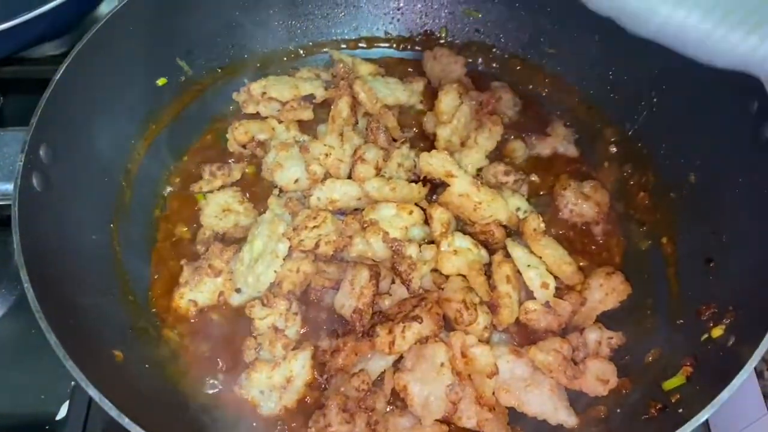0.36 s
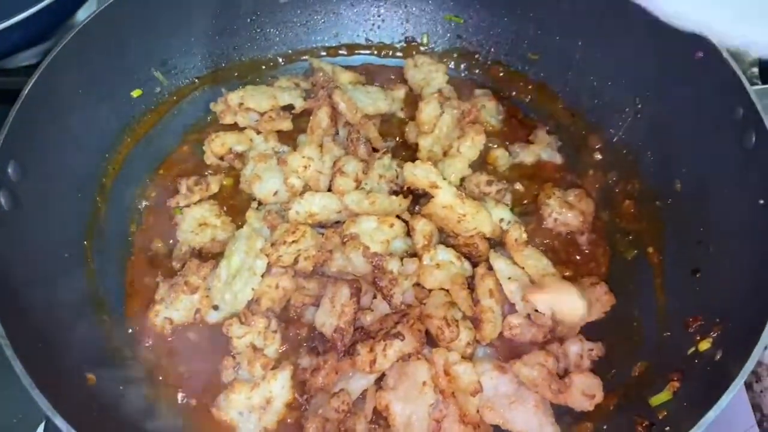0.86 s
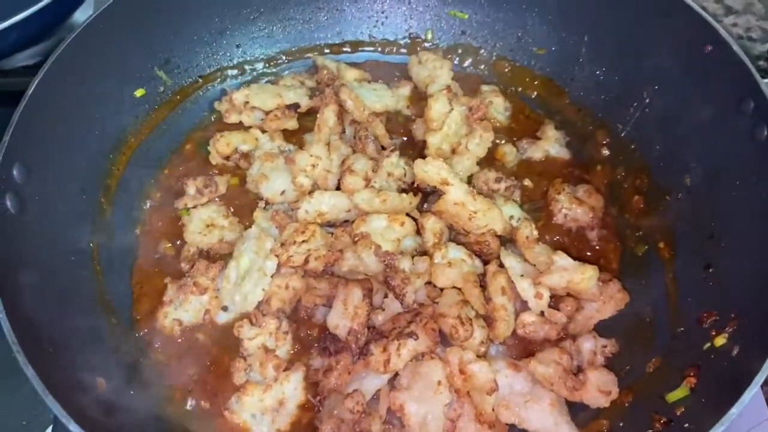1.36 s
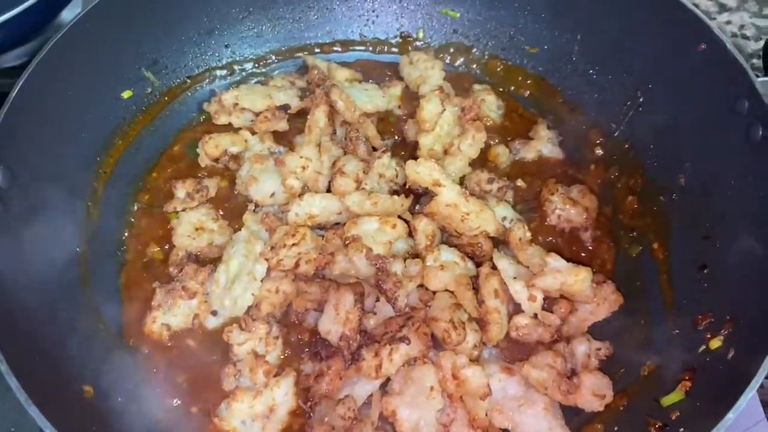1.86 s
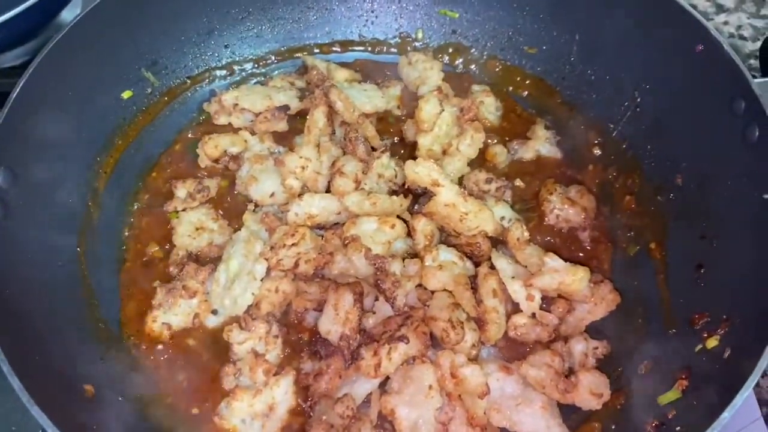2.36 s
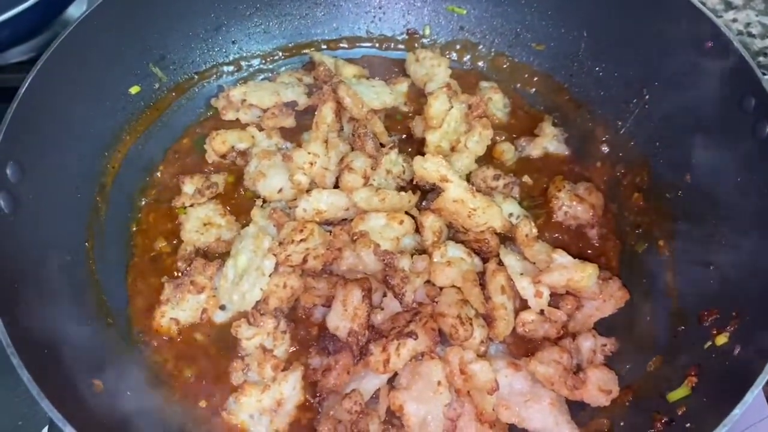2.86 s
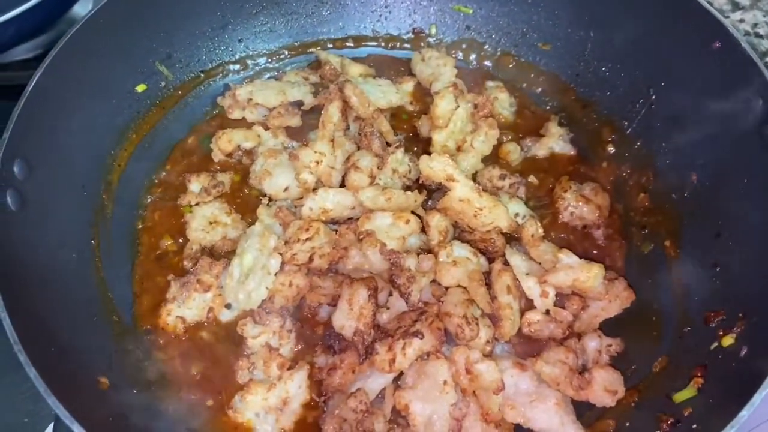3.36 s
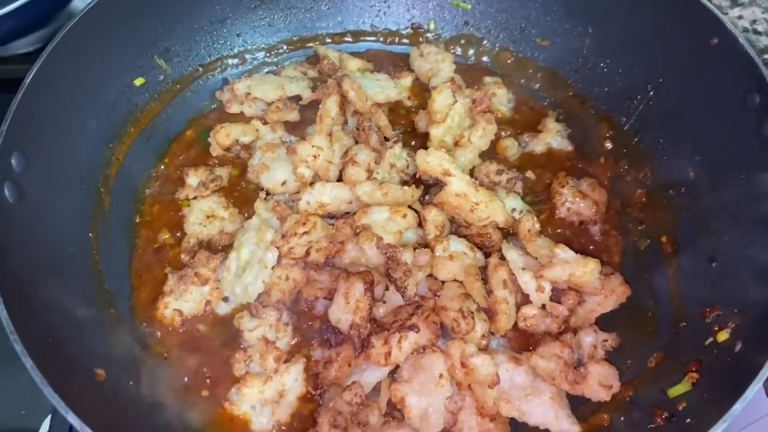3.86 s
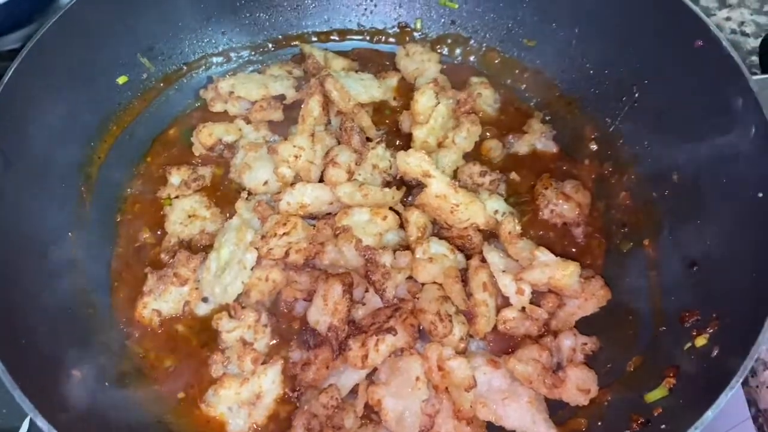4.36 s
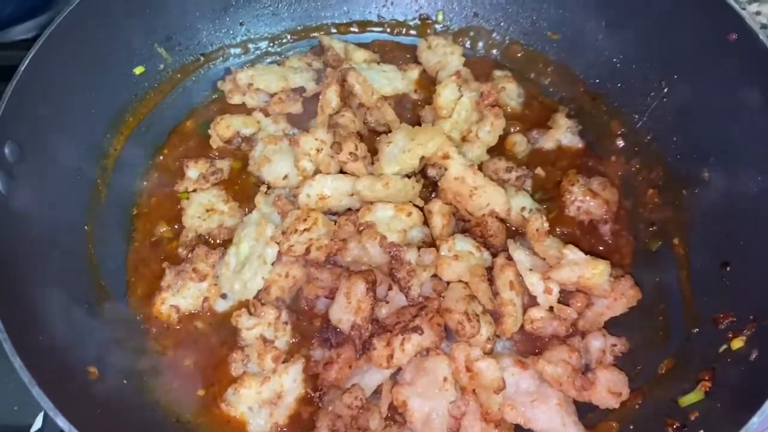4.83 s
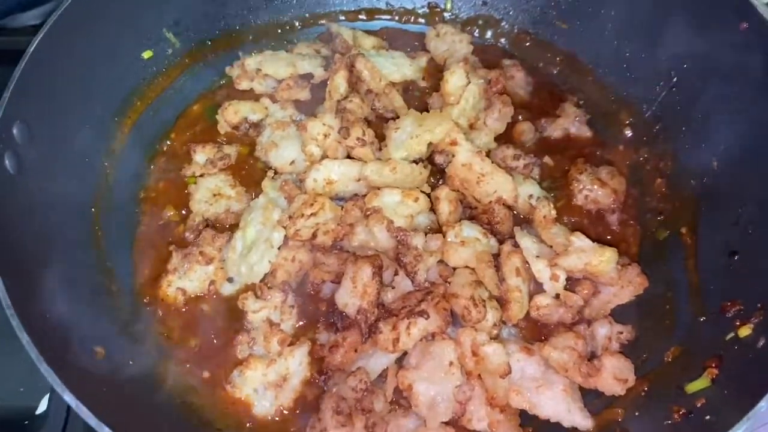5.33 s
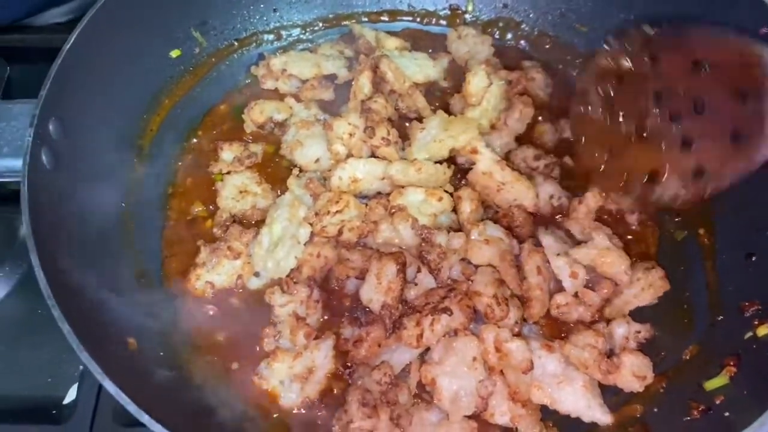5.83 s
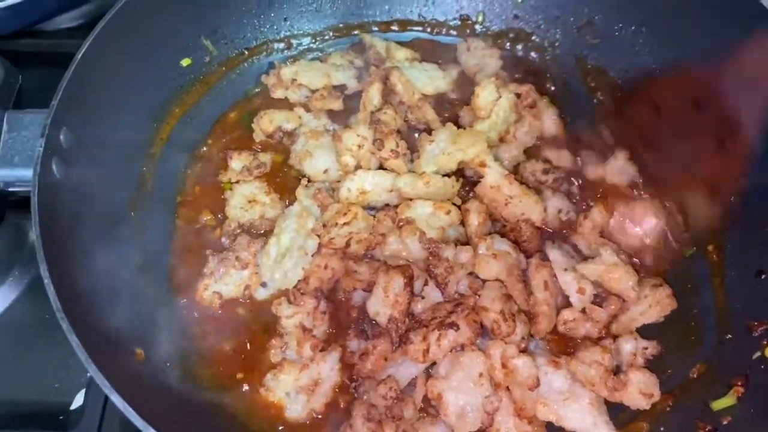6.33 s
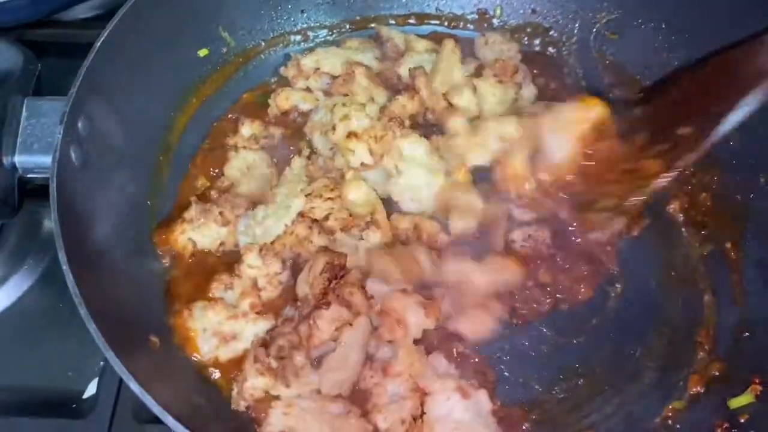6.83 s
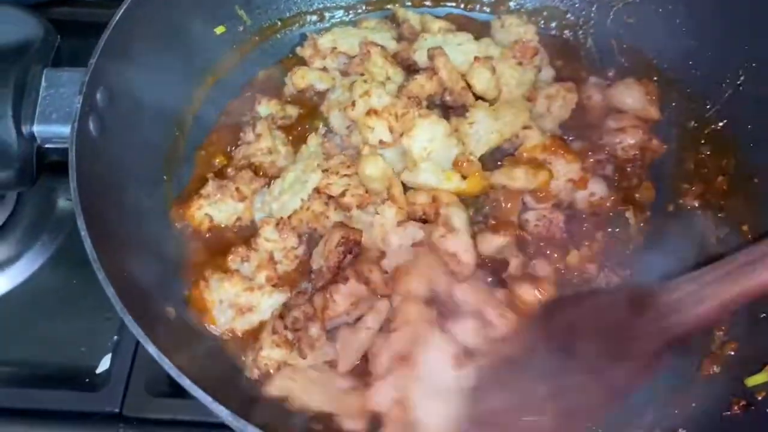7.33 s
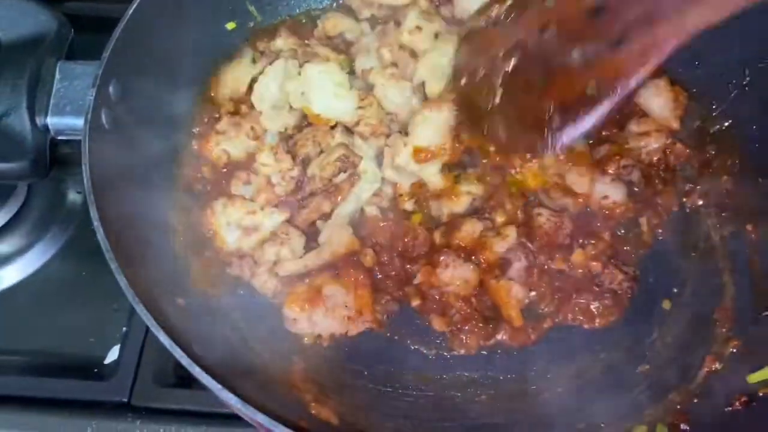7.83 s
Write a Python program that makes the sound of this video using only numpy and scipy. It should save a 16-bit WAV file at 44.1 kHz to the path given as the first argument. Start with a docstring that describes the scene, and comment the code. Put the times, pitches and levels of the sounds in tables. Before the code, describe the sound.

A steady low burner and fan drone lies beneath quiet, fine-grained simmering and crackle, slightly stronger after 3 seconds. In the first 0.6 seconds a thin, faint mid-pitched tone comes and goes. A dull low knock with a small bright splat lands at 0.7. At 2.1 a dish is set down with a sharp ceramic clack; tiny taps and a spoon clink follow at 2.3-2.7. At 2.8 a plate hits hard, by far the loudest blow, clipping harshly with a short ring. Firm double knocks and a clink come at 3.3-3.45, with duller raps around 3.8. Faint taps occur near 4.5-4.75, then mostly simmer until 5.66. From 6.2 a wooden spatula makes grainy, hollow scrapes, at 6.2, 6.55, 7.1 and 7.55-7.8, with wetter hiss and light pan knocks, ending on a soft low thump at 7.9. The close, small hard room adds short tails.

```python
"""Under it all a kitchen drones (shaped noise) and sauce simmers in a wok (hiss and crackle).
First a thin tone comes and goes; then come knocks with a low body (dying tones) and bright noise puffs.
Beside the stove a hand sets down a dish, then a plate with the loudest blow, at which the sound clips.
A metal spoon clinks along the way, and more knocks follow. Last, a wooden spatula scrapes through the food
(rough grains in the pan's resonances). A small hard room answers the blows with a dying noise tail."""
import sys
import numpy as np
from scipy import signal
from scipy.fft import rfft, irfft, next_fast_len
from scipy.io import wavfile
from scipy.ndimage import uniform_filter1d, map_coordinates

SR = 44100
rng = np.random.default_rng(int(sys.argv[2]) if len(sys.argv) > 2 else 0)


def invert_db(level):
    """Linear amplitude ratio for a level in decibels (20 dB per decade), elementwise."""
    return 10 ** (np.asarray(level, dtype=float) / 20)


def pcm_store(signal):
    """Save signal as 16-bit PCM."""
    levels = np.round(np.clip(np.atleast_2d(signal), -1, 1) * 32767)
    wavfile.write(sys.argv[1], SR, levels.astype(np.int16).T)


N = 350595  # length of the scene in samples

# Tone colour of burner and fan: (frequency [Hz], relative level per Hz [dB])
DRONE_COLOUR = [(15, -20), (25, -0.5), (45, -5.5), (65, -3.5), (110, -1.5), (165, -12.5), (190, -6.5),
                (265, -12.5), (360, -5), (430, -10), (545, -7), (800, -8.5), (1250, -11.5), (1600, -12),
                (1900, -16.5), (2600, -20.5), (4000, -82)]
# Air resonances around the stove: (frequency [Hz], width [Hz], gain [dB])
AIR_SPACES = [(120, 26, 3), (208, 9, 8.5), (535, 33, 7.5), (1000, 43, 6.5)]
# Tone colour of the bubbling sauce: (frequency [Hz], relative level [dB])
SIZZLE_COLOUR = [(1500, -11), (1900, -9), (2300, -12.5), (2700, 0.5), (3400, 2.5), (4500, -2), (5400, 2),
                 (6900, 0.5), (8500, -1), (10500, -1.5), (13100, 1.5), (15100, -0.5), (16000, -2.5)]
# How hard the pan simmers: (time [s], simmer gain [dB])
SIMMER_GAIN = [(0, 0.5), (2, 0.5), (3.1, 2), (4.6, 2), (6.1, 1.5), (6.9, 2), (7.5, 2.5), (7.95, 0.5)]
# A thin tone that comes and goes: (start [s], length before the fade [s], rms level [dB])
WHINE_TIMES = [(0.038, .1, -59), (0.156, .04, -57), (0.328, .09, -51.5), (.49, .09, -60)]
# How fast the room's answer dies: (frequency [Hz], time to fall 60 dB [s])
ROOM_DECAY = [(200, 0.22), (1000, 0.3), (4000, 0.24), (12000, 0.11)]
# Low body of the blows, and a few thumps alone:
# (time [s], rough peak level [dB], frequency [Hz], time to fall 60 dB [s])
LOW_BODIES = [(0.706, -29.5, 216, 0.28), (.708, -34, 357, 0.28), (2.101, -38.5, 128, 0.38),
              (2.797, -30, 65, 0.2), (2.794, -30.5, 130, 0.14), (2.796, -26.5, 334, 0.11),
              (3.339, -32, 126, 0.2), (3.338, -22.5, 350, 0.081), (3.416, -28.5, 358, 0.13),
              (3.765, -41, 69, 0.34), (3.855, -33, 299, 0.068), (4.048, -36, 255, 0.16),
              (4.239, -36.5, 392, 0.14), (4.25, -35, 743, 0.076), (4.287, -36, 400, 0.066),
              (4.545, -34.5, 727, .1), (4.752, -38, 346, .13), (6.124, -28.5, 212.4, 0.31),
              (7.891, -30.5, 263.4, 0.14), (7.913, -33.5, 296, 0.11)]
# Short puffs of bright noise, splats of sauce, some of them during the spatula strokes: # (time [s], noise
# level before filtering [dB], centre [Hz], time to fall 60 dB [s])
BRIGHT_PUFFS = [(.700, -27.5, 6350, .1), (0.708, -30, 5540, 0.16), (4.510, -33.5, 8600, 0.078),
                (6.272, -33.5, 11000, .05), (7.13, -40, 5600, 0.22), (7.285, -43, 9000, .12),
                (7.582, -39, 10000, .058)]
# Resonances of the pan under the blade: (frequency [Hz], width [Hz], relative level [dB])
PAN_MODES = [(232, 57, -2), (368, 46, 2), (538, 48, 3), (740, 33, 4), (1005, 155, -4), (1430, 160, -5),
             (1560, 390, -9)]
# Spatula strokes: (start [s], length before the fade [s], scrape level [dB],
# highest pitch aimed at by the hollow between blade and pan [Hz], hollow level over the scrape [dB])
SPATULA_STROKES = [(6.191, .33, -45, 1560, -7), (6.552, .25, -51.5, 1156, -12), (7.097, 0.21, -48, 1432, 0),
                   (7.543, 0.088, -48, 1120, -4), (7.685, 0.065, -48.5, 1200, -7)]
# What the worktop rings with: (frequency [Hz], relative level [dB], time to fall 60 dB at damping 1 [s])
WORKTOP_MODES = [(299, 1.5, 0.064), (383.6, -2, 0.24), (468, -15.5, 0.19), (549, -1.5, 0.13),
                 (663, -7, 0.11), (756, 0.5, 0.072), (812, 1.5, 0.052), (907.6, 2, 0.069),
                 (1000, -1.5, 0.15), (1130, 4.5, 0.052), (1250, -1.5, 0.14), (1402, -4, 0.17),
                 (1540, -1, 0.058), (1939, -3.5, 0.11), (2260, -4, 0.032), (2490, -8.5, 0.21),
                 (3140, 3, 0.037)]
# Knocks on the worktop and pan: (time [s], rough peak level [dB], centre [Hz], damping factor,
# crack noise level before filtering [dB])
KNOCK_BLOWS = [(.700, -28.5, 500, 2.2, -48), (.709, -25.5, 550, 1.3, -43), (2.1026, -15.5, 1320, 0.8, -12),
               (2.289, -36.5, 1200, 0.8, -40), (2.307, -37.5, 1000, 1.3, -38),
               (2.576, -37, 1100, 0.72, -39), (2.690, -26.5, 1000, 0.57, -21.5),
               (2.7944, 3, 1050, 2.7, -12), (3.337, -12.5, 1280, 1.7, -24), (3.374, -19, 750, 1.4, -42),
               (3.4153, -16.5, 1280, 1.1, -22.5), (3.430, -11.5, 1250, 2.5, -23.5),
               (3.763, -17, 860, 1.5, -27.5), (3.797, -23.5, 805, 1, -36), (3.829, -24, 800, 0.91, -35),
               (3.855, -31, 500, 1.9, -44), (4.510, -38, 990, 1.2, -33), (4.545, -38, 700, 0.66, -38.5),
               (4.585, -36, 750, 1.2, -42), (4.634, -43, 1500, 0.98, -48), (4.748, -39, 450, 1.5, -48),
               (5.662, -33, 644, 0.81, -42), (6.119, -35, 496, 1.3, -44), (6.203, -38, 450, 1.2, -36),
               (6.865, -33.5, 1050, 0.82, -36), (7.027, -33.5, 770, 1.3, -49),
               (7.092, -36.5, 600, 2.3, -38), (7.291, -25, 1130, 1.5, -41), (7.363, -33, 1000, 2.2, -44),
               (7.574, -36, 520, 1.07, -51)]
# What the spoon, dish and plate ring with: (frequency [Hz], relative level [dB], time to fall 60 dB [s])
SPOON_MODES = [(6433, -8, .11), (7876, -6, .13), (9878, -3, .1), (10060, -6, .12), (12060, 0, .1),
               (13820, 0, .07), (14310, -3, .09), (14700, -3, .09), (15500, -8, .07)]
DISH_MODES = [(1491, -15, .4), (1852, -10, .18), (2202, -9, .24), (2439, -13, .2), (2568, -17, .22),
              (3122, -17, .2), (3591, -13, .2), (3941, -9, .2), (4210, -10, .19), (4500, -15, .15),
              (4786, -11, .17), (4974, -8, .085), (5518, -18, .17), (5790, 0, .055), (6718, -17, .18),
              (6858, -7, .11), (7994, -17, .18), (9238, -15, .12), (10600, -24, .1)]
PLATE_MODES = [(1685, -26, .18), (1857, -28, .2), (1958, -16, .14), (2089, -6, .13), (2110, -13, .2),
               (2164, -22, .45), (2190, -20, .3), (2227, -8, .24), (2280, -13, .2), (3628, 0, .07),
               (3700, -25, .25), (3850, -16, .14), (4290, -22, .17), (5190, -34, .17), (5537, -15, .21),
               (6425, -24, .24), (6837, -42, .25), (7843, -33, .26), (8247, -42, .2)]
# When each of them is struck: (time [s], rough peak level [dB])
SPOON_TIMES = [(2.6903, -33), (2.794, -19.5), (3.3368, -26), (3.3987, -27.5), (3.8921, -40), (4.5096, -41)]
DISH_TIMES = [(2.102, -15)]
PLATE_TIMES = [(2.7945, 1.5)]


def unit(x):
    """Scales a sound to rms 1."""
    return x / np.sqrt(np.mean(x ** 2) + 1e-20)


def along(points, hz):
    """Reads a table of (frequency, value) on a log frequency axis."""
    f, v = np.transpose(points)
    return np.interp(np.log(hz + 1), np.log(f + 1), v)


def wobble(rate):
    """A smooth random curve with rate random points a second."""
    knots = rng.standard_normal(int(N * rate / SR) + 4)
    return map_coordinates(knots, [np.arange(N) * rate / SR])


def filtered(x, response):
    """Shapes x by a complex response, given as a function of frequency."""
    m = next_fast_len(len(x) + 8192)
    spectrum = rfft(x, m) * response(np.fft.rfftfreq(m, 1 / SR))
    return irfft(spectrum, m)[:len(x)]


def peak(f, hz, width_hz):
    """A resonance of height 1 that answers only after it is driven."""
    return 1j * f * width_hz / (hz * hz - f * f + 1j * f * width_hz + 1e-9)


def patchy(depth_db):
    """Noise with patches of random gain in time and pitch."""
    z = signal.stft(rng.standard_normal(N), nperseg=512)[2]
    field = uniform_filter1d(rng.standard_normal(z.shape), size=6, axis=0)
    field = uniform_filter1d(field, size=10, axis=1)
    noise = signal.istft(z * invert_db(depth_db * unit(field)), nperseg=512)[1]
    return unit(noise[:N])


def grains(per_s, spread_db):
    """Clicks at random moments, a few much larger than the rest."""
    happens = rng.random(N) < per_s / SR
    size_db = spread_db * rng.exponential(size=N)
    return unit(happens * rng.standard_normal(N) * invert_db(size_db))


def add(track, s, sound):
    """Adds a sound into the track from time s."""
    part = track[round(s * SR):][:len(sound)]
    part += sound[:len(part)]


def envelope(start, length, attack, release):
    """Rises over the attack, holds until start + length, then fades over the release."""
    t = np.arange(N) / SR - start
    return np.clip(np.minimum(t / attack, 1 + (length - t) / release), 0, 1)


def burst(db, hz, t60):
    """A dying puff of noise around one pitch."""
    t = np.arange(SR // 4) / SR
    noise = rng.standard_normal(len(t)) * invert_db(db - 60 * t / max(t60, .005))
    return filtered(noise, lambda f: peak(f, hz, 1.0 * hz) ** 2)


def ringing(modes, attack, rough, gain_db=0, damping=1):
    """Dying tones; near reflections make each flutter in size and phase. The sum peaks near 1."""
    hz, db, t60 = np.transpose(modes)[:, :, None]
    t = np.arange(SR // 2) / SR
    knots = rng.standard_normal((2, len(modes), 80))
    flutter = [np.array([np.interp(t * 150, np.arange(80), k) for k in part]) for part in knots]
    depth = rough * np.minimum(t / 0.0057, 1)  # the flutter sets in over 5.7 ms
    size = (1 + depth * (flutter[0] + 1j * flutter[1])) / np.sqrt(1 + depth ** 2)
    phase = 2 * np.pi * (hz * t + rng.random(hz.shape))
    decay = invert_db(db + gain_db - 60 * damping * t / t60)
    ring = np.sum(decay * np.imag(size * np.exp(1j * phase)), axis=0)
    ring = ring * (1 - np.exp(-t / attack))
    first_rms = np.sqrt(np.mean(ring[:SR // 100] ** 2))  # over the first 10 ms
    return ring / (3 * first_rms)


def simmer():
    """How hard the pan simmers, in dB, for every sample."""
    s, db = np.transpose(SIMMER_GAIN)
    return np.interp(np.arange(N) / SR, s, db)


def drone():
    """Burner and fan noise, coloured by the air spaces around the stove."""
    BASE_DB, GROWTH = -50, 1  # level before simmer gain; dB per dB of simmer

    def colour(f):
        air_db = sum(db * abs(peak(f, hz, w)) ** 2 for hz, w, db in AIR_SPACES)
        return invert_db(along(DRONE_COLOUR, f) + air_db)

    level_db = BASE_DB + GROWTH * simmer() + 0.84 * wobble(5.2)
    return invert_db(level_db) * unit(filtered(patchy(depth_db=0.74), colour))


def sizzle():
    """Tiny bubbles burst in the sauce: a hiss with dense crackle; the finest fizz grows fastest."""
    HISS_DB, FIZZ_DB = -55.5, -54  # levels before simmer gain
    FIZZ_GROWTH = 1.35  # dB per dB of simmer
    simmer_db = simmer()
    bursts = patchy(depth_db=1.1) + .42 * grains(per_s=1200, spread_db=1.6)
    whole = filtered(bursts, lambda f: invert_db(along(SIZZLE_COLOUR, f)))
    fizz = filtered(whole, lambda f: np.clip((f - 7000) / 1500, 0, 1))
    hiss = whole - fizz
    mix = invert_db(HISS_DB + simmer_db) * unit(hiss)
    mix = mix + invert_db(FIZZ_DB + FIZZ_GROWTH * simmer_db) * unit(fizz)
    return invert_db(1.07 * wobble(7.9) + 0.48 * wobble(30)) * mix


def whine():
    """One slightly unsteady tone that fades in and out."""
    ATTACK_S, RELEASE_S = 0.017, .03
    size = sum(invert_db(db) * envelope(s, length, ATTACK_S, RELEASE_S) for s, length, db in WHINE_TIMES)
    pitch_hz = 1370 + 4 * wobble(41)
    return np.sqrt(2) * size * np.sin(2 * np.pi * np.cumsum(pitch_hz) / SR)


def kitchen(x):
    """The room's answer: a noise tail in which each frequency dies at its own speed."""
    hz, t, z = signal.stft(rng.standard_normal(SR // 2), SR, nperseg=256)
    decay = invert_db(-60 * t / along(ROOM_DECAY, hz)[:, None])
    tail = signal.istft(z * decay, SR, nperseg=256)[1]
    late = np.pad(x, (150, 0))  # delayed by 150 samples
    return signal.fftconvolve(late, tail / np.linalg.norm(tail))[:N]


def low_bodies():
    """Low body of the blows, and a few thumps alone: one mode each with a slower start."""
    out = np.zeros(N)
    for s, db, hz, t60 in LOW_BODIES:
        add(out, s, invert_db(db) * ringing([(hz, 0, t60)], attack=0.0023, rough=0.35))
    return out


def bright_puffs():
    """Short puffs of bright noise: splats of sauce, some of them during the spatula strokes."""
    out = np.zeros(N)
    for s, db, hz, t60 in BRIGHT_PUFFS:
        add(out, s, burst(db, hz, t60))
    return out


def spatula():
    """Wood drags on the coating: grains in the pan's resonances and a moving hollow; the sauce hisses more."""
    ATTACK_S, RELEASE_S = 0.031, .1
    FLAT_HZ = 1100  # hollow with the blade flat on the pan; tilting it raises the pitch
    WET_HISS_DB, WET_HISS_GROWTH = -50.5, 0.79  # for an average stroke; dB per dB of scrape
    t = np.arange(N) / SR
    shapes, tilt = [], np.zeros(N)
    for s, length, _, top_hz, _ in SPATULA_STROKES:
        shapes.append(envelope(s, length, ATTACK_S, RELEASE_S))
        progress = np.clip((t - s) / (length + RELEASE_S), 0, 1)
        tilt += np.log2(top_hz / FLAT_HZ) * np.sin(np.pi * progress)  # in octaves
    shapes = np.array(shapes)
    _, _, scrape_db, _, hollow_db = np.transpose(SPATULA_STROKES)
    hiss_db = WET_HISS_DB + WET_HISS_GROWTH * (scrape_db - scrape_db.mean())

    def pan_response(f):
        # neighbouring resonances have opposite signs
        return sum((-1) ** k * invert_db(db) * peak(f, hz, w) for k, (hz, w, db) in enumerate(PAN_MODES))

    drag = grains(per_s=4000, spread_db=1.5) * invert_db(1.2 * wobble(35))
    pan = filtered(drag, pan_response)
    slow = filtered(rng.standard_normal(N), lambda f: 1 / (1 + (f / 130) ** 2))
    hollow = slow * np.sin(2 * np.pi * np.cumsum(FLAT_HZ * 2 ** tilt) / SR)
    bursts = patchy(depth_db=2.2) + .5 * grains(per_s=800, spread_db=1.6)
    hiss = filtered(bursts, lambda f: invert_db(along(SIZZLE_COLOUR, f)))
    # each stroke's level times its shape, summed over the strokes
    scrape = (invert_db(scrape_db) @ shapes) * unit(pan)
    scrape = scrape + (invert_db(scrape_db + hollow_db) @ shapes) * unit(hollow)
    return scrape + (invert_db(hiss_db) @ shapes) * unit(hiss)


def knocks():
    """Each blow wakes the modes near its own pitch and adds a short burst of noise, the crack."""
    NARROW_DB = 6.5  # modes fall off by this per octave squared from the centre
    CRACK_HZ, CRACK_S = 3520, 0.062  # the crack's pitch and its time to fall 60 dB
    out, hz = np.zeros(N), np.array(WORKTOP_MODES)[:, :1]
    for s, db, centre_hz, damping, crack_db in KNOCK_BLOWS:
        near_db = -NARROW_DB * np.log2(hz / centre_hz) ** 2
        ring = ringing(WORKTOP_MODES, attack=.0006, rough=1.27, gain_db=near_db, damping=damping)
        add(out, s, invert_db(db) * ring)
        add(out, s, burst(crack_db, CRACK_HZ, CRACK_S))
    return out


def clinks(modes, blows, rough):
    """A hard thing is struck: every blow rings the same modes, with a very quick start."""
    out = np.zeros(N)
    for s, db in blows:
        add(out, s, invert_db(db) * ringing(modes, attack=0.000232, rough=rough))
    return out


def scene():
    """Blows with the room's answer, over the steady sounds and the spatula."""
    plate = clinks(PLATE_MODES, PLATE_TIMES, rough=.85)
    dish = clinks(DISH_MODES, DISH_TIMES, rough=3.0)
    spoon = clinks(SPOON_MODES, SPOON_TIMES, rough=0.47)
    blows = plate + dish + spoon + knocks() + low_bodies() + bright_puffs()
    background = drone() + sizzle() + whine()
    mix = blows + invert_db(-8) * kitchen(blows) + background + spatula()
    return mix[None]  # one channel


def top_cut(x):
    """Nothing passes above the cut-off."""
    return signal.sosfilt(signal.butter(12, 16200, fs=SR, output="sos"), x)


def record(dry):
    """The sound clips at full scale; a steep lowpass at 16 kHz then removes the top treble."""
    clipped = np.clip(dry[0], -1, 1)
    dulled = filtered(clipped, lambda f: 1 / (1 + (f / 16000) ** 60))
    finished = np.clip(dulled, -1, 1)[None]
    return top_cut(finished)


dry = scene()
out = record(dry)
pcm_store(out)
```